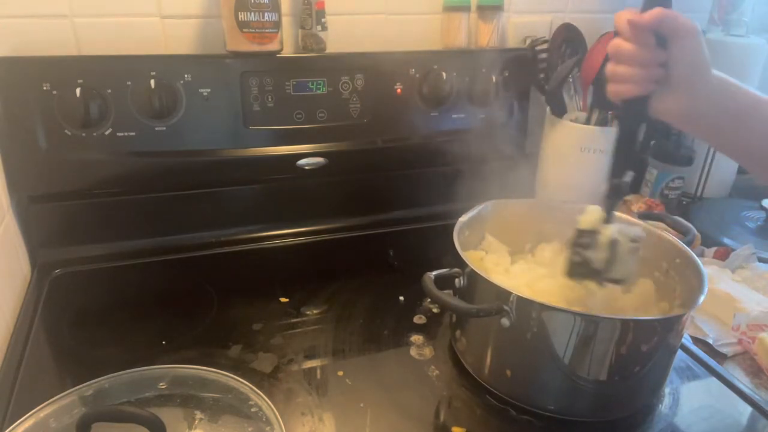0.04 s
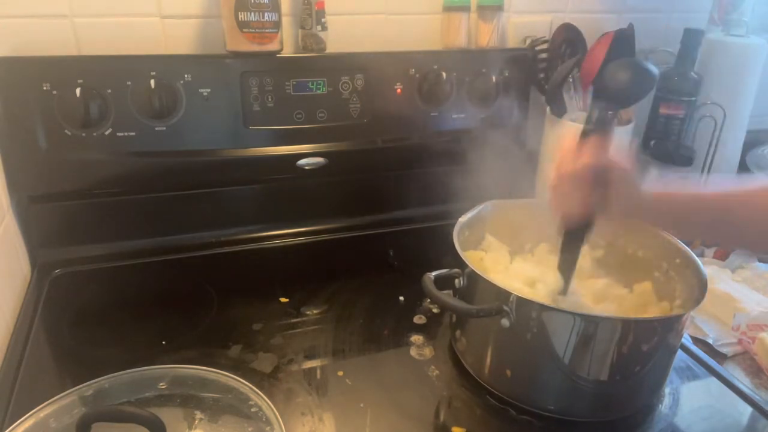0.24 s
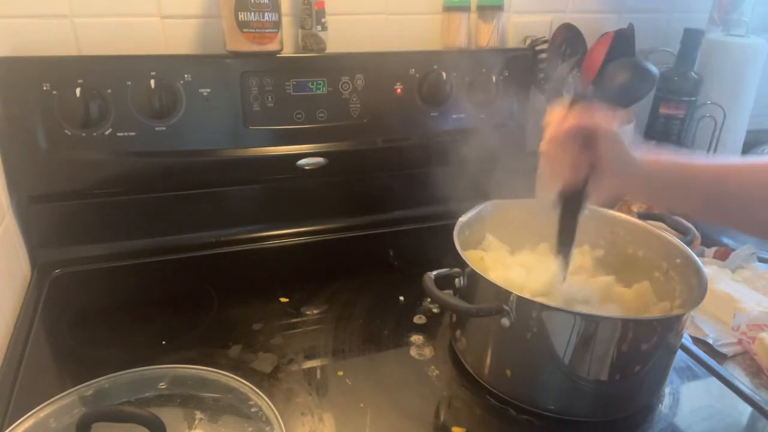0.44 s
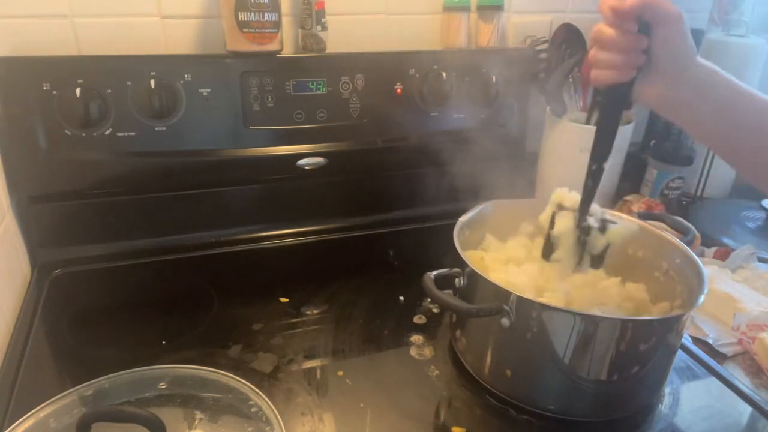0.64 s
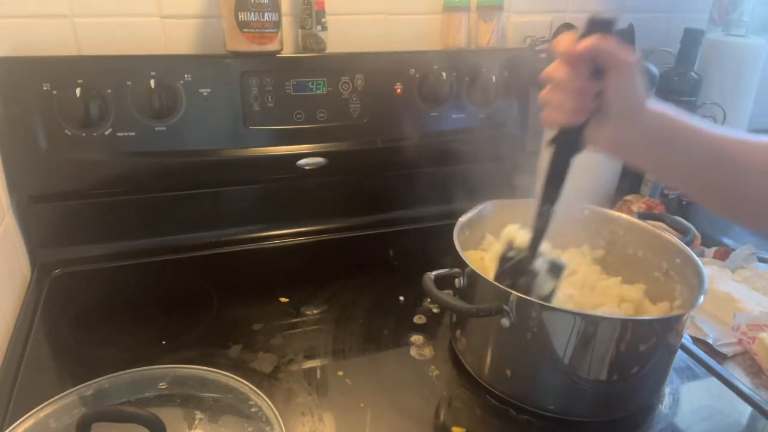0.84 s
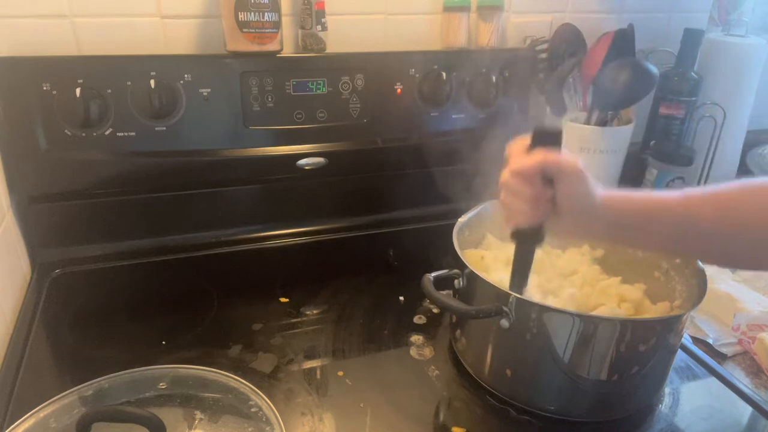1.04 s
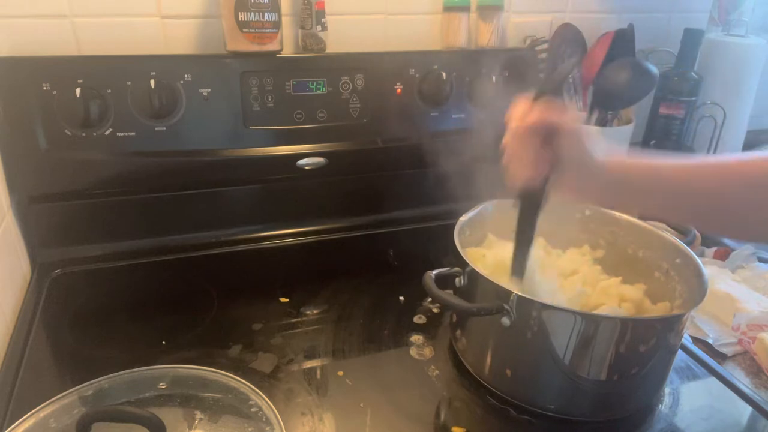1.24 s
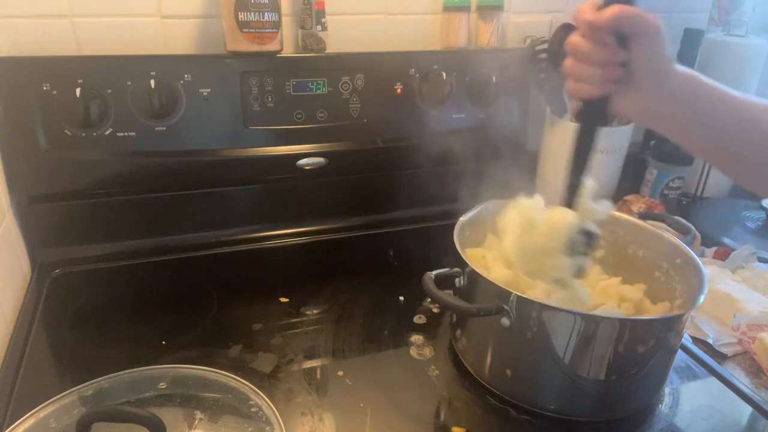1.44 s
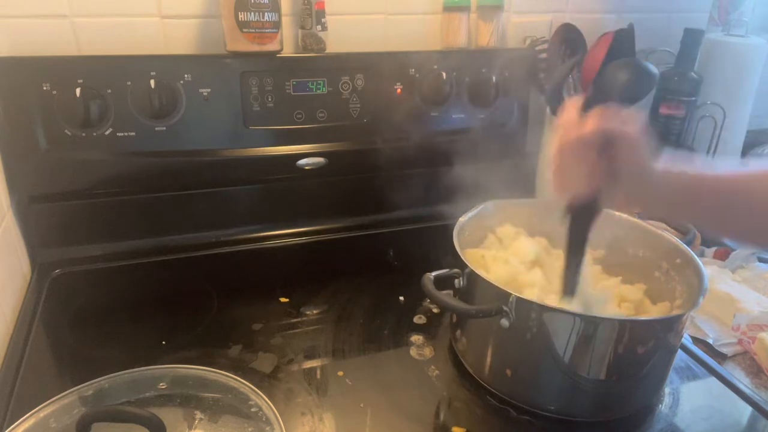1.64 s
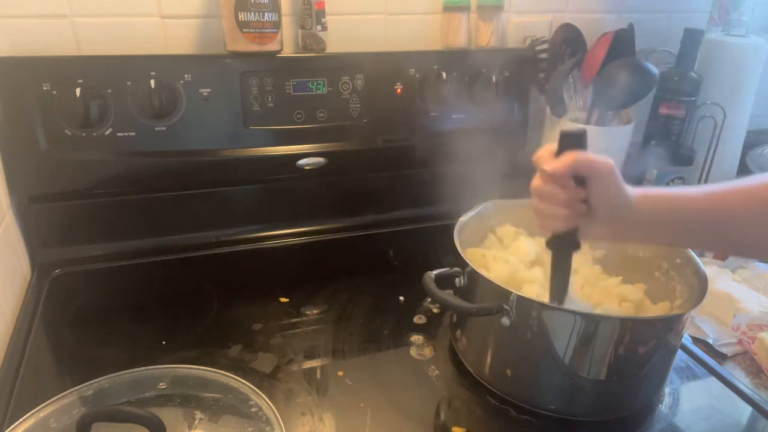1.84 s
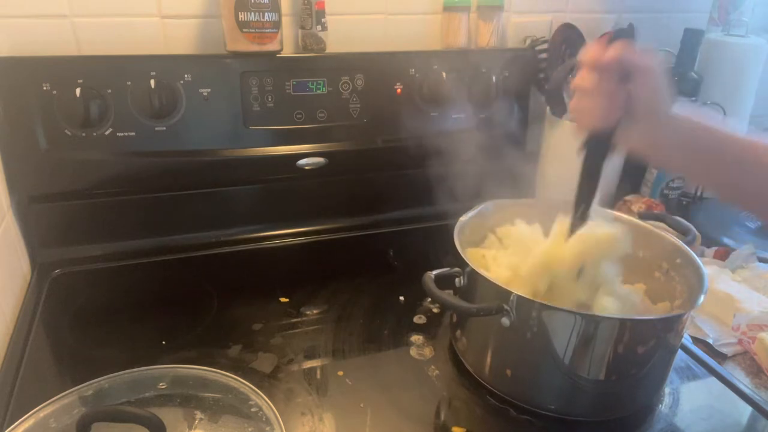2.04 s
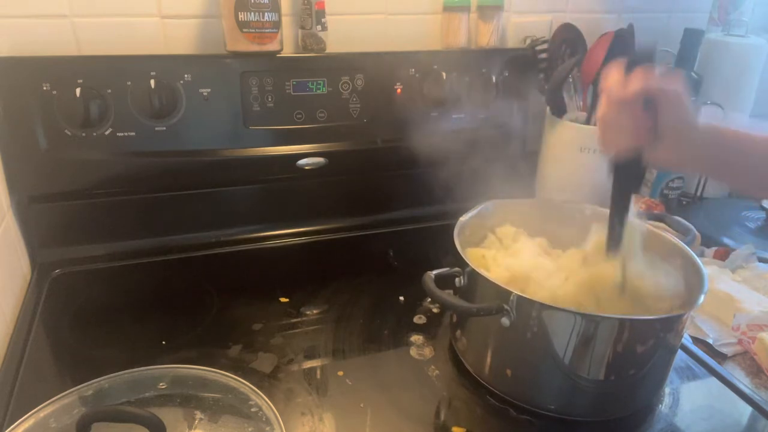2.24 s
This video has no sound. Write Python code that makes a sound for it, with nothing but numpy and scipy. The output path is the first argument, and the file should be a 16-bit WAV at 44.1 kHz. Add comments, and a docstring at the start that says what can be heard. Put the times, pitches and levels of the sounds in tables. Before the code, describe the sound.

Boiled potatoes are mashed in a metal pot in a small kitchen. The masher knocks sharply once, then twice more, cushioned by the mash, amid faint wet hissing and little thuds over a low appliance hum.

```python
"""A plastic masher goes three times through boiled potatoes in a steel pot, over a quiet appliance hum.
At 0.25 s the mash squishes and the masher knocks hard on the damped pot bottom; a dry tick follows.
At 1.05 s and 1.75 s come two softer, duller knocks, cushioned by the mash.
Just after the third the masher touches the pot again with a brief, faint, high click.
Throughout, the mash hisses, squeaks and thuds; the stove booms faintly and the small kitchen rings."""
import sys
import numpy as np
from scipy import signal
from scipy.fft import rfft, irfft
from scipy.io import wavfile
from scipy.ndimage import uniform_filter1d

SR = 44100
rng = np.random.default_rng(int(sys.argv[2]) if len(sys.argv) > 2 else 0)


def waveform_to_disk(signal):
    """Save audio, clipped to [-1, 1], as 16-bit WAV at the path in sys.argv[1]."""
    frames = np.transpose(np.atleast_2d(signal))
    scaled = np.clip(frames, -1, 1) * 32767
    samples = np.round(scaled).astype(np.int16)
    wavfile.write(sys.argv[1], SR, samples)


N = 101429


def amp(db):
    """Decibels to gain."""
    return 10 ** (np.asarray(db) / 20)


def unit(x):
    """Scale to rms 1."""
    return x / np.sqrt(np.mean(x ** 2) + 1e-20)


def read(points, hz):
    """Interpolate a table on a log-frequency axis."""
    f, value = np.transpose(points)
    return np.interp(np.log(hz + 1), np.log(f + 1), value)


def add(mix, start_s, sound):
    """Mix a sound in at start_s."""
    part = mix[max(round(start_s * SR), 0):][:len(sound)]
    part += sound[:len(part)]


def colour(x, gain, size=8192):
    """Minimum-phase filter with magnitude gain(f/Hz)."""
    log_gain = np.log(np.maximum(gain(abs(np.fft.fftfreq(size, 1 / SR))), 1e-5))
    response = np.exp(np.conj(signal.hilbert(log_gain)))
    taps = np.fft.ifft(response).real[:size // 2]
    return signal.fftconvolve(x, taps)[:len(x)]


def drift(rate_hz):
    """Slow random wander, rms 1."""
    lowpass = np.exp(-(np.fft.rfftfreq(N, 1 / SR) / rate_hz) ** 2)
    return unit(irfft(rfft(rng.standard_normal(N)) * lowpass, N))


def swell(centre_s, sigma_s):
    """Gaussian envelope, peak 1."""
    return np.exp(-.5 * ((np.arange(N) / SR - centre_s) / sigma_s) ** 2)


def decay(t, t60_s):
    """Exponential fall, 60 dB in t60_s."""
    return amp(-60 * t / t60_s)


def smooth_burst(envelope, smooth_bins=301):
    """Enveloped noise, flattened spectrum, unit energy."""
    spectrum = rfft(rng.standard_normal(len(envelope)) * envelope)
    local_power = uniform_filter1d(abs(spectrum) ** 2, smooth_bins)
    burst = irfft(spectrum / np.sqrt(local_power), len(envelope))
    burst[len(burst) // 2:] = 0
    return burst


# Room air spectrum: f/Hz, level/dB
AIR_SPECTRUM = [(20, -14), (40, -9), (65, -11), (95, -18.5), (130, -14), (200, -15.5), (300, -10.5),
                (450, -13.5), (600, -15.5), (850, -19.5), (1270, -25.5), (1840, -28.5), (2330, -32),
                (3450, -35.5), (8000, -40), (15800, -45.5)]
# Appliance tones: f/Hz, rms level/dB
HUM_TONES = [(172.3, -73), (409.1, -64.5), (1809, -74), (3327, -81), (4264, -87), (7359, -82.5)]


def background(air_db=-58, throb_hz=11.51, throb_db=-49):
    """Room air, wavering appliance hum and a steady throb below hearing."""
    air = amp(air_db) * unit(colour(rng.standard_normal(N), lambda f: amp(read(AIR_SPECTRUM, f))))
    hum = np.zeros(N)
    for hz, db in HUM_TONES:
        waver_hz = 2.41 + 0.00292 * hz
        pitch_hz = hz + waver_hz * drift(rate_hz=40.3)
        flutter = 1 + 0.31 * drift(rate_hz=12.5)
        hum += amp(db) * flutter * np.sin(2 * np.pi * np.cumsum(pitch_hz) / SR)
    throb = amp(throb_db) * np.cos(2 * np.pi * throb_hz * np.arange(N) / SR)
    return air + np.sqrt(2) * (hum + throb)


# Kitchen decay: f/Hz, t60/s
TAIL_T60 = [(100, 0.46), (500, 0.55), (1050, 0.36), (2000, 0.35), (4000, 0.48), (10000, 0.7)]
# Kitchen tail spectrum: f/Hz, level/dB
TAIL_SPECTRUM = [(80, 11), (200, -7), (400, 0.5), (600, -0.5), (1050, 2), (2000, -1.5), (4000, -1.5),
                 (10000, -12)]


def kitchen(x, gain_db=-9.5, delay_s=.012):
    """Diffuse tail, each band dying at its own rate."""
    hz, t, bands = signal.stft(rng.standard_normal(SR), SR, nperseg=256)
    tail = signal.istft(bands * decay(t, read(TAIL_T60, hz)[:, None]), SR)[1]
    tail = colour(tail / np.linalg.norm(tail), lambda f: amp(read(TAIL_SPECTRUM, f)))
    out = np.zeros(N)
    add(out, delay_s, signal.fftconvolve(x, tail))
    return amp(gain_db) * out


# Reflections off stove back, wall and room: delay/s, level/dB
REFLECTIONS = [(.0125, -15.5), (.0255, -15.5), (.064, -17.5), (.08, -22)]


def echoes(x, corner_hz=1750):
    """Dull early reflections."""
    out = np.zeros(N)
    dull = colour(x, lambda f: 1 / (1 + (f / corner_hz) ** 2))
    for delay_s, db in REFLECTIONS:
        add(out, delay_s, amp(db) * dull)
    return out


# Stove body modes: f/Hz, level/dB, t60/s
STOVE_MODES = [(64, -32.5, 1), (66.7, -38, 0.48)]


def stove(rise_s=0.0095):
    """Each knock sets two close sheet-metal modes beating: a faint boom."""
    out, t = np.zeros(N), np.arange(SR) / SR
    modes = sum(amp(db) * decay(t, t60_s) * np.sin(2 * np.pi * hz * t) for hz, db, t60_s in STOVE_MODES)
    boom = (1 - np.exp(-t / rise_s)) * modes
    for start_s, db, *_ in BLOWS:
        add(out, start_s, amp(db) * boom)
    return out


def tick(start_s=.2712, peak_db=-19.5, corner_hz=680):
    """One thin dry tick: a sharp edge, no ring."""
    out, t = np.zeros(N), np.arange(SR // 20) / SR
    add(out, start_s, amp(peak_db) * np.exp(-2 * np.pi * corner_hz * t))
    return out


# Squeaks and one click: centre t/s, sigma/s, f/Hz, bandwidth/Hz, level/dB
NARROW_BURSTS = [(0.319, 0.025, 9920, 450, -71.5), (.65, .04, 6100, 2520, -72.5),
                 (1.111, 0.014, 9950, 450, -73.5), (1.241, 0.019, 3800, 800, -66.5),
                 (1.683, 0.0054, 2040, 321, -58.5), (1.684, 0.0072, 1410, 400, -62),
                 (1.764, 0.0012, 3900, 600, -57), (1.93, 0.059, 3950, 900, -71.5)]


def squeaks_and_click():
    """Narrow-band noise: squeaks of squeezed air; at 1.764 s a click as the masher touches the pot again."""
    out = np.zeros(N)
    for centre_s, sigma_s, hz, width_hz, db in NARROW_BURSTS:
        band = colour(rng.standard_normal(N), lambda f: 1 / (1 + (2 * (f - hz) / width_hz) ** 2))
        out += amp(db) * swell(centre_s, sigma_s) * unit(band)
    return out


# Mash sliding through the masher: centre t/s, sigma/s, level/dB, treble gain/dB
MASH_SLIDES = [(0.219, 0.068, -63, -2.5), (0.427, 0.061, -64.5, -6.5), (0.66, 0.058, -68.5, -10),
               (0.926, 0.034, -71, 5.5), (0.992, 0.043, -61, -28), (1.177, 0.08, -63, -12),
               (1.55, 0.016, -89.5, 22.5), (1.673, 0.045, -66.5, -1.5), (1.88, 0.2, -63.5, -14.5),
               (2.288, 0.031, -85, 15.5)]
# Wet mash spectrum: f/Hz, level/dB
MASH_SPECTRUM = [(200, -29.5), (700, -5.5), (1900, -4), (2800, -7.5), (4000, -7.5), (6000, -13),
                 (12000, -11.5), (16000, -31.5)]


def squishes(pops_per_s=22000, treble_hz=5000):
    """Tiny wet pops merge into a soft hiss that swells as the masher moves."""
    pops = rng.standard_normal(N) * (rng.random(N) < pops_per_s / SR)
    wet = unit(colour(pops, lambda f: amp(read(MASH_SPECTRUM, f))))
    highpass = 1 / (1 + (treble_hz / (np.fft.rfftfreq(N, 1 / SR) + 1)) ** 2)
    treble = irfft(rfft(wet) * highpass, N)
    out = np.zeros(N)
    for centre_s, sigma_s, db, treble_db in MASH_SLIDES:
        shelved = wet + (amp(treble_db) - 1) * treble
        out += amp(db) * swell(centre_s, sigma_s) * shelved
    return out


# Lumps giving way: t/s, level/dB, f/Hz
LUMPS = [(.229, -41, 503), (.268, -31, 100), (0.427, -40, 291), (.78, -45, 191), (1.045, -33.5, 404),
         (1.056, -38, 141), (1.062, -37, 75), (1.117, -44.5, 222), (1.129, -41.5, 167), (1.15, -46.5, 110),
         (1.25, -48, 275), (1.256, -43, 184), (1.288, -48, 144), (1.824, -38.5, 253), (1.842, -38, 175),
         (1.874, -44.5, 143), (1.877, -43.5, 315)]


def thuds(rise_s=0.0018, t60_s=0.038):
    """Each lump collapses under the masher with a short low tone."""
    out, t = np.zeros(N), np.arange(SR // 2) / SR
    envelope = (1 - np.exp(-t / rise_s)) * decay(t, t60_s)
    for start_s, db, hz in LUMPS:
        add(out, start_s, amp(db) * envelope * np.sin(2 * np.pi * hz * t))
    return out


# Masher on pot bottom: t/s, level/dB, cushion corner/Hz, cushion order, top corner/Hz
BLOWS = [(.2453, -13.5, 2630, 1.3, 12000), (1.0482, -27.5, 875, 1.02, 3580),
         (1.7490, -25.5, 920, 0.67, 3960)]
# Modes of the loaded pot on the stove: f/Hz, level/dB, t60/s
POT_MODES = [(100, -35, 0.2), (153.4, -26, 0.14), (195, -24.5, 0.11), (273, -15, 0.15), (344.6, -19.5, 0.2),
             (448, -17, 0.11), (533, 0.5, 0.053), (658, -8, 0.033), (795, -12.5, 0.052),
             (1042, -27.5, 0.15), (1159, -10, 0.031), (1307, -16, 0.093), (1654, -18.5, 0.061),
             (1928, -19.5, 0.13)]
# Crack and dense short ring of pot wall, masher and stove: f/Hz, level/dB
CLATTER_SPECTRUM = [(100, -15), (400, -11), (600, -0.5), (820, -0.5), (930, -10.5), (1050, -5.5),
                    (1950, -5.5), (2200, -11.5), (2700, -11.5), (3500, -20.5), (4500, -18.5), (7000, -21),
                    (9500, -31), (15000, -32)]


def knocks(crack_db=11, clatter_db=-8, clatter_rise_s=0.00023, clatter_t60_s=0.1, low_cut_hz=65):
    """Each blow cracks, clatters and rings the pot; mash under the masher cushions the treble."""
    out, t = np.zeros(N), np.arange(SR) / SR
    ring = sum((-1) ** k * amp(db) * decay(t, t60_s) * np.sin(2 * np.pi * hz * t)
               for k, (hz, db, t60_s) in enumerate(POT_MODES))
    envelope = (1 - np.exp(-t / clatter_rise_s)) * decay(t, clatter_t60_s)
    crack = colour(signal.unit_impulse(SR), lambda f: amp(read(CLATTER_SPECTRUM, f)))
    crack /= np.linalg.norm(crack)
    radiation = lambda f: f / np.hypot(f, low_cut_hz)  # the pot radiates little deep bass
    for start_s, db, corner_hz, order, top_hz in BLOWS:
        clatter = signal.fftconvolve(smooth_burst(envelope), crack)[:SR] * np.linalg.norm(envelope)
        body = ring + amp(crack_db) * crack + amp(clatter_db) * clatter
        cushion = lambda f: (1 + (f / corner_hz) ** 2) ** (-order / 2) / (1 + (f / top_hz) ** 2)
        add(out, start_s, amp(db) * colour(body, lambda f: cushion(f) * radiation(f)))
    return out


def scene():
    """Pot sounds with echoes and tail; stove, tick and background dry. Mono."""
    pot = knocks() + squishes() + squeaks_and_click() + thuds()
    return (pot + echoes(pot) + kitchen(pot) + stove() + tick() + background())[None]


def record(dry):
    """Band limit at 15.8 kHz."""
    lowpass = signal.firwin(701, 15800, window=("kaiser", 9), fs=SR)
    return signal.oaconvolve(dry, lowpass[None], "same")


dry = scene()
out = record(dry)
waveform_to_disk(out)
```